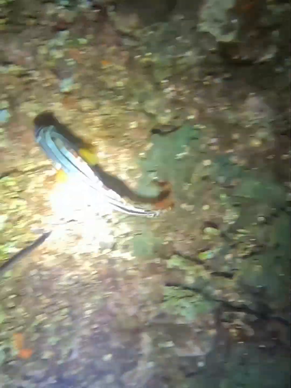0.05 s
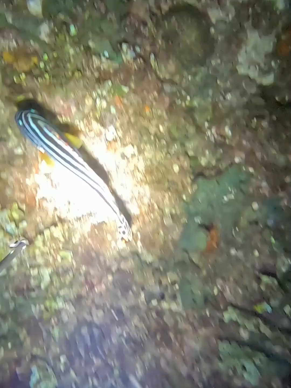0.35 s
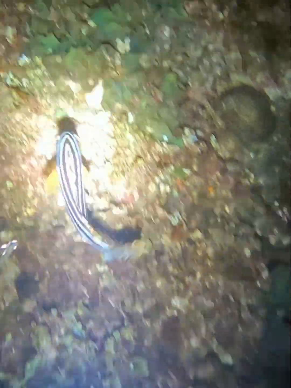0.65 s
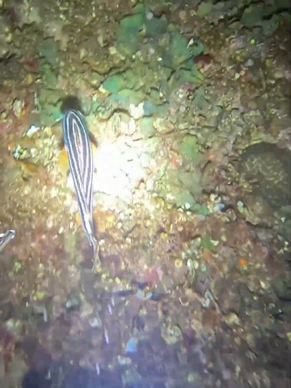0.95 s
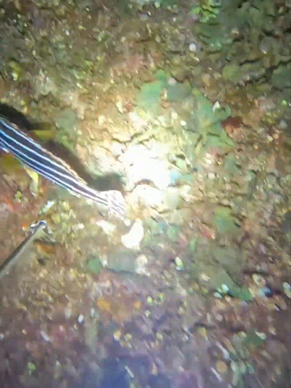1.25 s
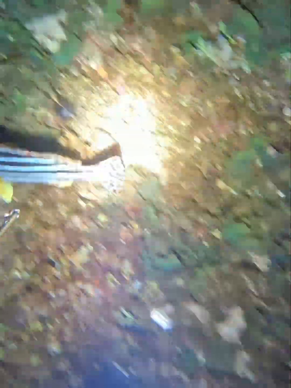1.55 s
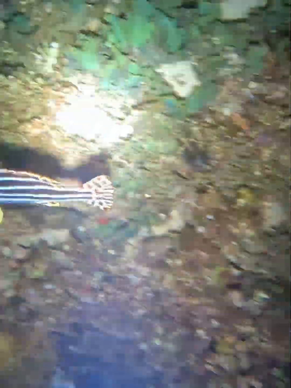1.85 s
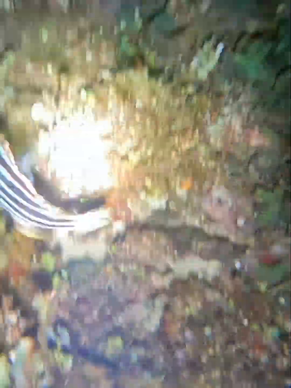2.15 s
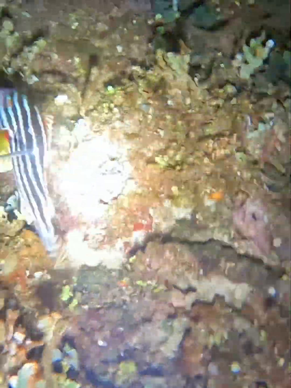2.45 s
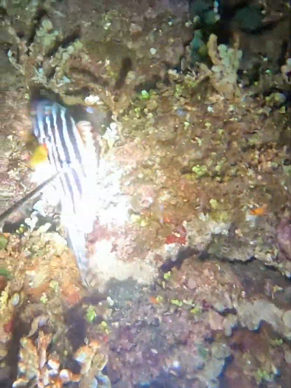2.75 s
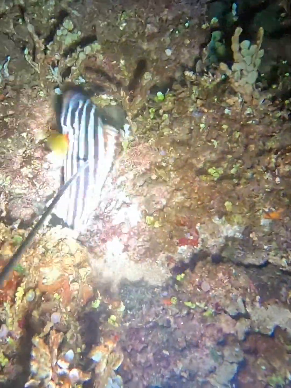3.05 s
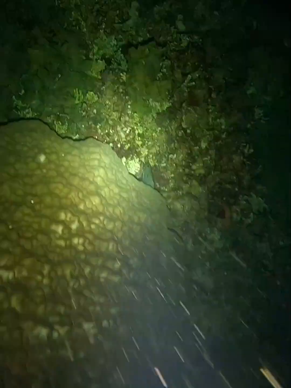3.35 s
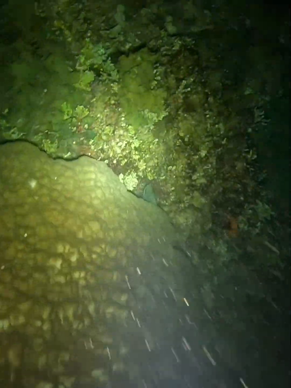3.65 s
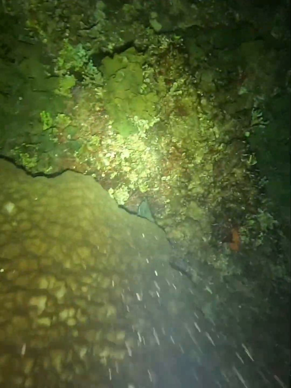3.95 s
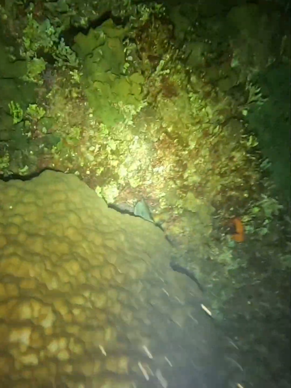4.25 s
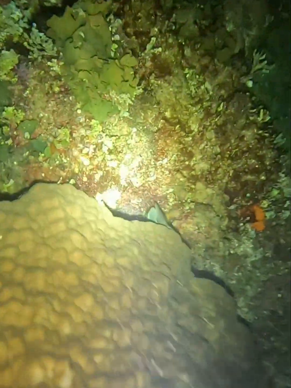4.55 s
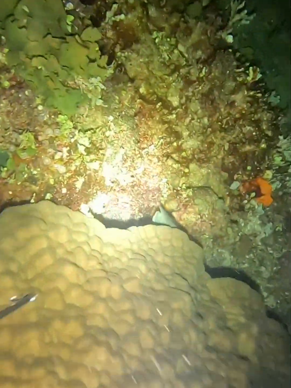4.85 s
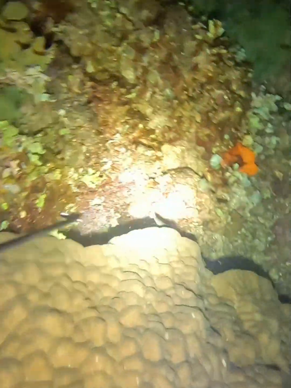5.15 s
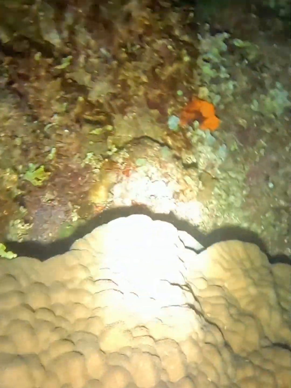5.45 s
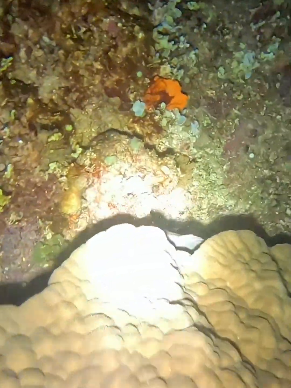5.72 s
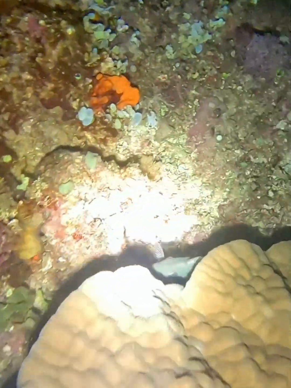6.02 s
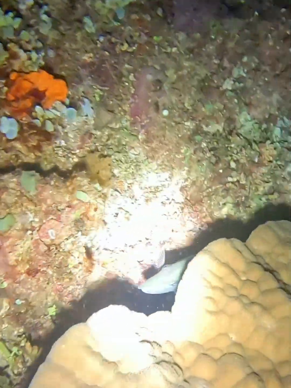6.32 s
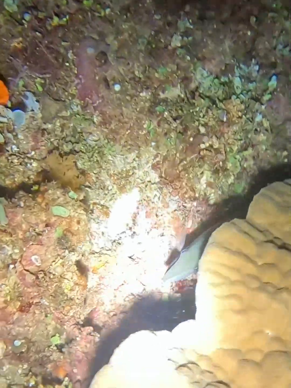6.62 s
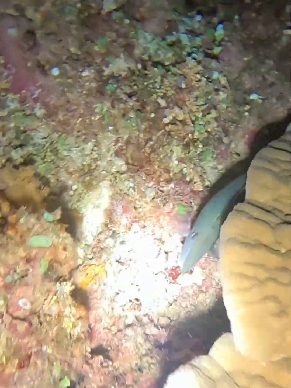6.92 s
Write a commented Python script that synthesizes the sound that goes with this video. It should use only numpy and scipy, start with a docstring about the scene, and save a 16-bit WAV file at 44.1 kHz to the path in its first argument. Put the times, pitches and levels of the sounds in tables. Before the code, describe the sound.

Heard through a waterproof case, a low, muffled flow of water surges beneath scattered glugs and a faint crackle of shrimp. A close, fizzy blast of bubbles erupts after two seconds, by far the loudest event, and sputters away over about a second. After a split second of silence, humming surges, small bubble clusters and sparse snaps continue on the reef.

```python
"""Water rumbles and hums against a camera housing on a night reef dive, with shrimp snapping all around.
Bubbles glug as they pulsate, alone and in clusters, coloured by the resonances of the case.
About two seconds in, a gush of air bursts close by and breaks into a train of gurgles,
with a thin whistle of escaping air behind them. The sound drops out briefly midway,
and the stereo image narrows to mono through the middle stretch."""
import sys
import numpy as np
from scipy import signal
from scipy.fft import rfft, irfft
from scipy.io import wavfile

SR = 44100
rng = np.random.default_rng(int(sys.argv[2]) if len(sys.argv) > 2 else 0)


def wav_record(signal):
    """Record a signal, one row per channel, as 16-bit PCM in the file named by sys.argv[1]."""
    frames = np.transpose(np.atleast_2d(signal))
    bounded = np.clip(frames, -1, 1)
    # unit amplitude maps onto the largest positive 16-bit level
    quanta = np.round(bounded * 32767).astype(np.int16)
    wavfile.write(sys.argv[1], SR, quanta)


N = 307818
SIZE = 8192  # samples in a one-shot
TIME, AGE = np.arange(N) / SR, np.arange(SIZE) / SR
FREQS = np.arange(N // 2 + 1) * SR / N
BLAST_S = 2.158  # cue for the first blast of air


def undb(db):
    """Decibels to gain."""
    return 10 ** (np.asarray(db) / 20)


def unit(x):
    """Scale to rms 1."""
    return x / np.sqrt(np.mean(x ** 2))


def automation(points):
    """Straight ramps between (time, value) breakpoints."""
    return np.interp(TIME, *np.transpose(points))


def add(out, s, sound):
    """Mix a one-shot in at time s."""
    start = max(int(s * SR), 0)
    out[start:start + SIZE] += sound[:N - start]


def through(x, ir):
    """Pass a sound through an impulse response."""
    return signal.fftconvolve(x, ir)[:len(x)]


def butter(x, order, hz, kind):
    """Butterworth filter."""
    return signal.sosfilt(signal.butter(order, hz, kind, fs=SR, output="sos"), x)


def envelope(s, length, attack, release):
    """Ramps up from time s over attack seconds; the decay starts at s + length."""
    return np.clip((TIME - s) / attack, 0, 1) * np.exp(-np.maximum(TIME - s - length, 0) / release)


def swell(rise, fall):
    """One-shot envelope: grows for rise seconds, then dies away."""
    return np.minimum(AGE / rise, 1) ** 2 * np.exp(-np.maximum(AGE - rise, 0) / fall)


def burst(rise, fall):
    """A puff of white noise."""
    return rng.standard_normal(SIZE) * swell(rise, fall)


def wander(rate):
    """Random drift with a spread near 1, turning about rate times a second."""
    return np.interp(TIME * rate, np.arange(1024), 1.2 * rng.standard_normal(1024))


def grains(rate, scatter_db):
    """About rate random impulses a second, scattered in level."""
    fires = rng.random(N) < rate / SR
    strength = np.minimum(rng.exponential(size=N), 4)
    return fires * undb(scatter_db * strength) * rng.choice([-1, 1], N)


def bubble(hz, t60, glide, onset=0.4):
    """A pulsating pocket of air or water: it swells over onset cycles and bends up as it fades."""
    fade = undb(-60 * AGE / t60)
    cycles = np.cumsum(hz * (1 + glide * (1 - fade))) / SR
    return fade * (1 - np.exp(-cycles / onset)) * np.sin(2 * np.pi * cycles)


def swarm(length, count, low_hz, high_hz, cycles):
    """Bubbles of random size within the first length seconds, rms near 1 while they last."""
    out = np.zeros(N)
    for when, size, strength in rng.random((count, 3)):
        hz = low_hz * (high_hz / low_hz) ** size
        add(out, when * length, undb(5.6 * strength) * bubble(hz, cycles / hz, glide=0.027, onset=1.4))
    return unit(out) * np.sqrt(length * SR / N)


# Boxy resonances of the case: (centre [Hz], width [Hz], boost at ring=1 [dB])
CASE_RESONANCES = [(135, 51, 6.5), (396.3, 31, 15), (618, 250, 10.5), (798, 110, 5), (1368, 65, 5),
                   (1640, 54, 5), (2150, 280, 4), (2514, 24, 8.5), (2930, 220, 10), (3610, 220, 9),
                   (4167, 200, 7), (5450, 340, 2)]
def housing(spectrum, ring=0.7):
    """Impulse response of a source spectrum heard through the case; ring scales the resonances."""
    f = np.arange(SIZE // 2 + 1) * SR / SIZE
    hz, db = np.transpose(spectrum)
    source_db = np.interp(np.log(f + 1), np.log(hz), db)
    boost_db = sum(boost / (1 + (2 * (f - centre) / width) ** 2)
                   for centre, width, boost in CASE_RESONANCES)
    cepstrum = irfft(np.log(undb(source_db + ring * boost_db)))
    # minimum phase, so the ringing follows the hit
    fold = np.r_[1, np.full(SIZE // 2 - 1, 2), 1, np.zeros(SIZE // 2 - 1)]
    return irfft(np.exp(rfft(cepstrum * fold)))[:SIZE // 2]


# Fader ride on the distant shrimp bed: (time [s], level [dB])
SIZZLE_RIDE = [(0, -66), (0.6, -68), (2.1, -64), (3.2, -71), (3.55, -67), (4.15, -65), (4.8, -68),
               (6.0, -66.5), (6.25, -66), (6.98, -65)]
# Tone of that bed: (frequency [Hz], gain [dB])
SIZZLE_EQ = [(500, -43.5), (950, -14), (1300, 1.5), (1800, -0.5), (2500, -0.5), (3900, -9.5), (5600, -5),
             (6500, -15.5), (9000, -25), (11000, -31), (13000, -25.5), (16000, -46)]
# Bright edge of a snap, far or near: (frequency [Hz], gain [dB])
CRACK_EQ = [(1000, -23.5), (4000, -7.5), (5800, 8), (7400, -11), (9200, -4.5), (11500, -33.5),
            (13000, -18.5), (16000, -20.5)]
def far_shrimp():
    """Distant snaps, smeared by the rock, merge into a flurrying sizzle dotted with tiny ticks."""
    snaps = through(grains(rate=560, scatter_db=7) ** 2, swell(0.00048, 0.0033))
    haze = rng.standard_normal(N) * np.sqrt(np.abs(snaps) / np.mean(snaps) + 0.5)
    sizzle = unit(through(haze, housing(SIZZLE_EQ)))
    sizzle_db = automation(SIZZLE_RIDE) - 0.43 * wander(rate=4.5)
    ticks = unit(through(grains(rate=60, scatter_db=-2), housing(CRACK_EQ)))
    return sizzle * undb(sizzle_db) + ticks * undb(-83)


# Close shrimp hits: (time [s], relative body level [dB], relative crack level [dB])
SNAP_CUES = [(0.1048, -48, -54), (0.3109, -49, -59), (0.335, -48, -50.5), (0.612, -49, -50),
             (0.857, -56, -57), (0.981, -50.5, -60), (1.0985, -52.5, -55.5), (1.174, -66, -55),
             (1.3553, -66, -55), (1.422, -42.5, -54), (1.5494, -55, -53), (1.672, -49, -66),
             (1.725, -74, -51.5), (1.967, -37.5, -59), (2.1012, -47, -74), (3.829, -34.5, -55),
             (3.862, -51, -59), (4.0548, -52.5, -49.5), (4.335, -40, -50.5), (4.673, -49, -49.5),
             (4.973, -51.5, -53.5), (5.3208, -48, -55), (5.693, -77, -65), (6.166, -42.5, -68),
             (6.206, -46, -62), (6.2595, -47.5, -59), (6.312, -54, -74), (6.352, -48.5, -57),
             (6.412, -60.5, -69), (6.511, -57, -56), (6.809, -53, -73), (6.889, -50.5, -65),
             (6.9676, -28, -35.5)]
# Body of a close snap: (frequency [Hz], gain [dB])
SNAP_EQ = [(500, -10), (950, -19), (1350, 0.5), (1900, 0), (2600, -3.5), (3900, -10), (5600, -13.5),
           (8500, -46), (11000, -44), (16000, -40.5)]
def near_shrimp():
    """Each close snap layers a sharp crack on a body smeared by the rock."""
    out = np.zeros(N)
    body_ir, crack_ir = housing(SNAP_EQ, ring=0.72), housing(CRACK_EQ, ring=0.3)
    smear = swell(0.0028, 0.0035) + 0.37 * swell(0.0056, 0.018)
    for s, body_db, crack_db in SNAP_CUES:
        body = through(rng.standard_normal(SIZE) * smear, body_ir)
        crack = through(burst(0.0019, 0.0011), crack_ir)
        add(out, s - 0.002, unit(body) * undb(body_db - 20.5))
        add(out, s, unit(crack) * undb(crack_db - 26.5))
    return out


# Muffled tone of bubbling: (frequency [Hz], gain [dB])
BUBBLE_EQ = [(100, -6), (190, 3.5), (290, 3), (400, -4), (500, -12.5), (640, -11.5), (900, -34.5),
             (1500, -67), (16000, -110)]
def patter():
    """A constant bed of far bubbles that swells round each cluster."""
    gain = undb(-57.5 - wander(rate=3.08))
    for s, length, db, _ in CLUSTER_CUES:
        gain = np.hypot(gain, undb(db - 2) * envelope(s, length, attack=0.019, release=0.086))
    return gain * unit(through(grains(rate=400, scatter_db=3), housing(BUBBLE_EQ, ring=0.6)))


# Bubble clusters, burble to fine fizz: (time [s], length [s], level [dB], centre pitch [Hz])
CLUSTER_CUES = [(0.326, 0.11, -53, 273), (1.295, 0.037, -54.5, 502), (1.538, 0.25, -53, 241.7),
                (1.856, 0.38, -51.5, 337), (2.939, 0.085, -49, 392.6), (3.059, 0.12, -55, 429),
                (3.182, 0.064, -52, 449), (3.246, 0.098, -55, 598), (3.539, 0.035, -67.5, 2240),
                (4.229, 0.043, -64.5, 2300), (4.558, 0.1, -50, 227), (4.829, 0.029, -79, 2540),
                (4.93, 0.2, -50, 351), (5.214, 0.15, -66.5, 2140), (5.498, 0.026, -62.5, 2300),
                (5.852, 0.094, -53.5, 383), (6.276, 0.051, -54, 290), (6.597, 0.38, -52, 336)]
def clusters():
    """Bubbles of similar size rise together, ringing around one pitch."""
    out, spread = np.zeros(N), 1.292  # pitch ratio either side of the centre
    for s, length, db, hz in CLUSTER_CUES:
        cluster = swarm(length, count=26, low_hz=hz / spread, high_hz=hz * spread, cycles=19)
        out += np.r_[np.zeros(int(s * SR)), cluster][:N] * undb(db)
    return out


# Surges along the case: (time [s], length [s], rumble level [dB], hum level [dB])
SURGE_CUES = [(0.063, 0.36, -46, -52), (1.507, 0.28, -39.5, -60), (1.729, 0.6, -35.5, -50),
              (2.302, 0.35, -52.5, -43), (3.491, 0.44, -77, -53.5), (3.857, 0.212, -50.5, -41),
              (4.232, 0.3, -45, -44.5), (4.478, 0.17, -39, -42.5), (4.73, 0.147, -54, -46),
              (4.937, 0.45, -49, -55), (5.918, 1.2, -48.5, -68)]
# Sub-heavy tone of the flow: (frequency [Hz], gain [dB])
RUMBLE_EQ = [(8, -9.5), (16, 3.5), (33, -1.5), (50, -10), (70, -18), (110, -20), (200, -40.5), (500, -83)]
# Thumps of water on the case: (time [s], level [dB], pitch [Hz], 60 dB decay [s])
THUMP_CUES = [(0.339, -11, 36.7, 0.099), (0.349, -19, 86, 0.062), (1.77, -19, 27, 0.3),
              (4.141, -30, 50, 0.1)]
def water():
    """Flow rumbles and thumps on the case and stirs its lowest resonance, harder in each surge."""
    flow, stir = undb(-43), undb(-70.5)  # floor between surges
    for s, length, rumble_db, hum_db in SURGE_CUES:
        surge = envelope(s, length, attack=0.11, release=0.14)
        flow = np.hypot(flow, surge * undb(rumble_db))
        stir = np.hypot(stir, surge * undb(hum_db))
    rumble = unit(through(rng.standard_normal(N), housing(RUMBLE_EQ, ring=0)))
    hum_hz = 137 + 4.5 * wander(rate=45)
    lumps = undb(3.5 * wander(rate=24))
    hum = unit(np.sin(2 * np.pi * np.cumsum(hum_hz) / SR) * lumps)
    buffet = unit(butter(rng.standard_normal(N), 3, [50, 250], "band"))
    out = rumble * flow * undb(2 * wander(rate=4.3))
    out += (hum + undb(-6) * buffet) * stir
    for s, db, hz, t60 in THUMP_CUES:
        add(out, s, -undb(db) * bubble(hz, t60, glide=0.076))
    return out


# Spot bubbles: (time [s], relative level [dB], pitch [Hz])
GLUG_CUES = [(0.185, -43, 670), (0.266, -34.5, 222), (0.341, -23, 196), (0.356, -25, 234),
             (0.441, -32, 254), (0.525, -38, 256), (0.692, -40.5, 227), (0.837, -35, 264),
             (0.906, -42.5, 274), (1.149, -37.5, 210), (1.307, -43, 232), (1.475, -41.5, 584),
             (3.591, -41, 149), (3.641, -32, 397), (3.747, -41.5, 250), (4.138, -33, 375),
             (4.319, -43, 380), (4.635, -34.5, 228), (4.837, -34.5, 138), (5.162, -33, 210),
             (5.599, -35.5, 200), (5.842, -36, 375), (6.113, -31.5, 132), (6.328, -40, 218),
             (6.8, -38.5, 328), (6.809, -41.5, 540)]
def glugs():
    """Lone bubbles ring for a few cycles and jolt the housing."""
    out, jolt_ir = np.zeros(N), housing(BUBBLE_EQ, ring=0.24)
    for s, db, hz in GLUG_CUES:
        jolt = through(burst(0.00086, 0.0082), jolt_ir)
        tone = bubble(hz, t60=12 / hz, glide=0.024, onset=1)
        add(out, s, undb(db) * (1.69 * tone + 0.5 * jolt / np.abs(jolt).max()))
    return out


# Thin bands of escaping air: (centre [Hz], width [Hz], level [dB])
WHISTLE_BANDS = [(6020, 320, -78), (8400, 600, -84), (12820, 420, -82)]
def whistle():
    """Once the flow has eased, the air feeding each pocket sings briefly in narrow bands."""
    air = np.zeros(N)
    for hz, width, db in WHISTLE_BANDS:
        band = rfft(rng.standard_normal(N)) / (1 + (2 * (FREQS - hz) / width) ** 4)
        air += undb(db) * unit(irfft(band, N))
    gates = [envelope(s, length=0.0078, attack=0.0068, release=0.017)
             for s, *_ in POCKET_CUES if 2.49 < s < 3.19]
    return air * np.max(gates, axis=0)


def gurgle():
    """Bubbles shed by the gush ring on between the pockets, fainter as they rise away."""
    start_s, fade_s = 2.28, 0.9
    bubbles = swarm(length=1.1, count=70, low_hz=298, high_hz=643, cycles=28)
    return np.roll(bubbles * undb(-43.5) * np.exp(-TIME / fade_s), int(start_s * SR))


# Dark body of churned water: (frequency [Hz], gain [dB])
CHURN_EQ = [(50, -25), (110, 2), (200, 4), (350, -2.5), (470, -15.5), (650, -11.5), (850, -26), (1100, -48),
            (2500, -63.5), (16000, -105)]
# Fizzy top of fine spray: (frequency [Hz], gain [dB])
SPRAY_EQ = [(500, -28.5), (1000, -1.5), (1350, 3.5), (1550, -2.5), (2300, 2.5), (3200, -12.5), (4350, -12),
            (4750, -20), (6500, -20), (9000, -38.5), (16000, -71.5)]
def wake():
    """The water churns and fizzes hard during the blast, then sputters and settles."""
    specks = grains(rate=640, scatter_db=3) * undb(-3.5 * wander(rate=77))
    churn = unit(through(specks, housing(CHURN_EQ, ring=0.31)))
    fizz = unit(through(specks, housing(SPRAY_EQ, ring=1.15)))
    blast, churn_tail, fizz_tail = (envelope(BLAST_S, length=0.13, attack=0.19, release=release)
                                    for release in (0.009, 0.49, 0.78))
    return (churn * np.hypot(undb(-25.5) * blast, undb(-44) * churn_tail)
            + fizz * np.hypot(undb(-38.5) * blast, undb(-57) * fizz_tail))


# Sparkle on the blast: (time [s], level [dB], pitch [Hz], attack [cycles], 60 dB decay [s])
CHIRP_CUES = [(2.169, -19, 1360, 3.6, 0.029), (2.171, -27.5, 2500, 3, 0.023), (2.181, -3.5, 1353, 7, 0.017),
              (2.181, -19.5, 2850, 8, 0.027), (2.191, -15.5, 2380, 8, 0.025),
              (2.194, -28.5, 3700, 6, 0.014), (2.201, -13.5, 1400, 4, .026), (2.204, -3, 2317, 6.3, .027),
              (2.205, -19.5, 2950, 8, .025), (2.207, -25, 4210, 13, 0.035), (2.232, -12, 1900, 1.4, .028),
              (2.2323, -18.5, 2980, 2, 0.019), (2.232, -13, 1370, 2, 0.024), (2.261, -14, 2940, 0.8, 0.019),
              (2.262, -19.5, 3560, 1, 0.0076), (2.263, -26.5, 2050, 2, 0.035), (2.303, -28, 2950, 2, .028),
              (2.329, -28, 2080, 2, 0.023)]
def chirps():
    """Little bubbles in the first blast ring high and die fast."""
    out = np.zeros(N)
    for s, db, hz, onset, t60 in CHIRP_CUES:
        add(out, s, undb(db) * bubble(hz, t60, glide=0.012, onset=onset))
    return out


# Modes of the case struck by each pocket: (pitch [Hz], relative level [dB], 60 dB decay [s])
KNOCK_MODES = [(127, -6, 0.15), (390, -12, 0.077), (805, -27.5, 0.052), (1350, -15.5, .07),
               (1600, -20, .08), (2480, -19, 0.081), (3000, -30, 0.076), (6100, -45.5, .06)]
def case_knock():
    """The case rings in its modes, slightly detuned on every hit."""
    out = np.zeros(SIZE)
    for hz, db, t60 in KNOCK_MODES:
        polarity = rng.choice([-1, 1])
        detune = 1 + 0.021 * rng.standard_normal()
        out += undb(db) * polarity * bubble(hz * detune, t60, glide=0.013, onset=2.1)
    return out


def shreds():
    """Four tiny bubbles tear off a pocket within a few milliseconds."""
    pitches, delays = rng.uniform(1200, 3100, size=4), rng.uniform(0, 0.006, size=4)
    return sum(np.roll(bubble(hz, t60=52 / hz, glide=0.027, onset=3.1), int(delay * SR))
               for hz, delay in zip(pitches, delays))


# Hollow midrange of a gulp: (frequency [Hz], gain [dB])
GULP_EQ = [(300, -32.5), (480, -13), (610, 0), (830, -6), (930, -18), (1200, -46.5), (16000, -100)]
# Crisp transient of a pop: (frequency [Hz], gain [dB])
POP_EQ = [(2000, -33.5), (5000, -7.5), (6300, 2), (8500, -9.5), (11500, -24.5), (12900, -14.5),
          (16000, -27.5)]
# Air pockets breaking loose, levels before each layer's trim:
# (time [s], body level [dB], gulp level [dB], spray level [dB], pitch [Hz])
POCKET_CUES = [(2.156, -24.5, -21, -46, 406), (2.169, -24.5, -29, -32, 142.6),
               (2.179, -19.5, -23.5, -32.5, 140), (2.194, -24, -26.5, -25, 383),
               (2.203, -27, -22, -22.5, 552), (2.211, -11.5, -30, -41, 393), (2.221, -15.5, -30.5, -31, 86),
               (2.232, -15.5, -19.5, -21.5, 617), (2.243, -13.5, -26.5, -24, 543),
               (2.261, -10, -19.5, -18, 198.4), (2.302, -29, -34, -33.5, 164),
               (2.328, -37.5, -34, -36, 104.2), (2.355, -39, -41, -56, 384),
               (2.371, -25, -34.5, -32.5, 374.4), (2.401, -35.5, -46, -38.5, 401),
               (2.423, -28.5, -33.5, -40.5, 337), (2.463, -28.5, -37.5, -37, 178.5),
               (2.476, -29, -36.5, -35, 395), (2.508, -19.5, -21.5, -29, 371),
               (2.545, -32, -27.5, -33.5, 134), (2.577, -28, -27.5, -31, 121.5),
               (2.616, -23, -25, -31, 358), (2.658, -28.5, -35, -46.5, 315), (2.701, -28, -25.5, -37, 139),
               (2.74, -30.5, -26.5, -43.5, 325), (2.778, -36.5, -35, -38, 334.6),
               (2.841, -46, -37.5, -44.5, 134), (2.864, -39, -46.5, -41, 309),
               (2.894, -33, -28.5, -35.5, 640), (2.907, -33.5, -28, -42, 117),
               (2.956, -34, -27.5, -44, 680), (3.004, -46, -37.5, -65, 363),
               (3.037, -52, -31.5, -49.5, 690), (3.058, -50.5, -52.5, -50.5, 640),
               (3.126, -42, -37, -46, 332), (3.168, -52.5, -44, -48.5, 475), (3.183, -34, -41, -43, 452),
               (3.207, -44.5, -36.5, -49.5, 402), (3.262, -47, -34, -69, 660),
               (3.282, -48, -38.5, -58.5, 700), (3.292, -51, -46, -54, 636), (3.315, -55, -54, -51.5, 600)]
def gush():
    """Each pocket of air pops, pulsates, gulps, churns the water, rings the case and tears into spray."""
    out = np.zeros(N)
    churn_ir, gulp_ir = housing(CHURN_EQ, ring=1.14), housing(GULP_EQ, ring=0.92)
    spray_ir, pop_ir = housing(SPRAY_EQ, ring=1.15), housing(POP_EQ)
    spray_shape = swell(0.002, 0.0063) + 0.15 * swell(0.011, 0.014)
    for s, body_db, gulp_db, spray_db, hz in POCKET_CUES:
        churn = unit(through(burst(0.0017, 0.0053), churn_ir))
        spray = unit(through(rng.standard_normal(SIZE) * spray_shape, spray_ir))
        pop = unit(through(rng.standard_normal(SIZE) ** 3 * swell(0.0033, 0.0061), pop_ir))
        gulp = unit(through(burst(0.00063, 0.0093), gulp_ir))
        spray += undb(-4) * unit(through(shreds(), spray_ir))
        tone = bubble(hz, t60=14.6 / hz, glide=0.022, onset=0.62)
        tone_db = 9 - 0.2 * np.log2(hz / 297)  # big, low pockets pulsate hardest
        knock_db = min(body_db, -27.5)  # stronger pockets ring the case no harder
        hardness = min((s - BLAST_S) / 0.053, 1) ** 2  # the first pockets open softly
        add(out, s, undb(body_db) * (undb(tone_db) * tone + undb(-14) * churn))
        add(out, s, undb(knock_db) * case_knock())
        add(out, s, undb(gulp_db - 20) * gulp)
        add(out, s, undb(spray_db) * (undb(-19.5) * spray + undb(-36.5) * hardness * pop))
    return out


# How the two microphones hear the case: (frequency [Hz], left over right [dB], left phase lag [rad])
MIC_BALANCE = [(50, 3.3, .1), (200, 2.5, .35), (300, 1.5, .7), (400, -1, 1.8), (500, -2.5, 1),
               (650, -5, .6), (800, -1, .2), (1370, 5, .85), (2400, 4, 1), (4200, 4, .8), (5400, 5, .1),
               (13000, 9, 0)]
def stereo_side(mid):
    """Side signal: level and phase gaps between the microphones, plus treble bouncing in the case."""
    hz, balance_db, lag = np.transpose(MIC_BALANCE)
    log_f, log_hz = np.log(FREQS + 1), np.log(hz)
    balance = undb(np.interp(log_f, log_hz, balance_db))
    ratio = balance * np.exp(-1j * np.interp(log_f, log_hz, lag))
    direct = irfft(rfft(mid) * (ratio - 1) / (ratio + 1), N)
    paths = burst(0.00022, 0.002)
    bounce = through(butter(mid, 1, 2500, "high"), paths / np.linalg.norm(paths))
    return direct + undb(-0.5) * wander(rate=16) * bounce


# Stretches where the image opens to stereo: (time [s], length [s])
WIDE_CUES = [(0.206, 2.29), (5.432, 1.6)]
def scene():
    """Everything that reaches the housing, mixed in mono and then spread left and right."""
    shrimp = far_shrimp() + near_shrimp()
    mid = shrimp + water() + patter() + glugs() + clusters()
    mid += gush() + chirps() + wake() + gurgle() + whistle()
    width = sum(envelope(s, length, attack=0.98, release=0.24) for s, length in WIDE_CUES)
    mid += width * undb(-1) * butter(shrimp, 3, [6400, 8000], "band")  # brighter crackle when wide
    side = width * stereo_side(mid)
    return np.array([mid + side, mid - side])


# Brief mute midway: (time [s], gain [0-1])
MUTE_RIDE = [(3.353, 1), (3.356, 0), (3.47, 0), (3.54, 1)]
def record(dry):
    """The camera rounds the loudest peaks and cuts the top; the sound drops out for a moment."""
    rounded = np.tanh(0.86 * dry) / 0.82
    high_cut = signal.ellip(8, 0.2, 70, 15900, fs=SR, output="sos")
    return signal.sosfilt(high_cut, rounded * automation(MUTE_RIDE))


dry = scene()
out = record(dry)
wav_record(out)
```